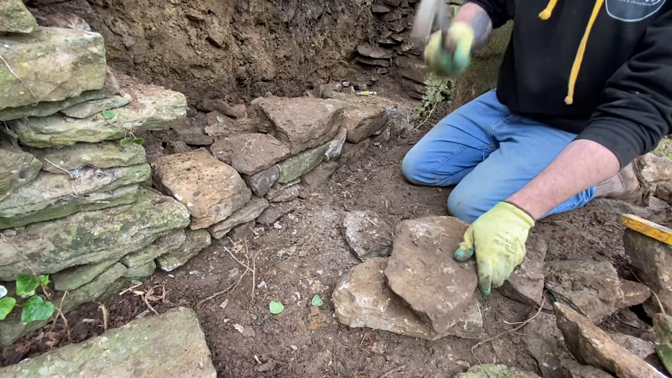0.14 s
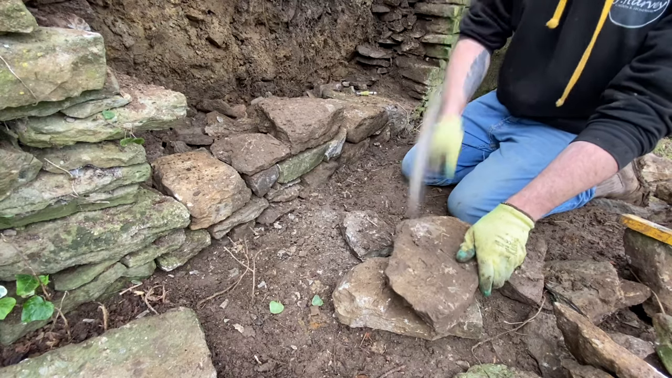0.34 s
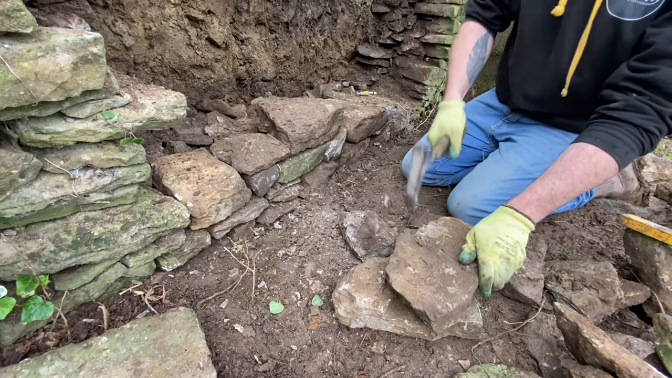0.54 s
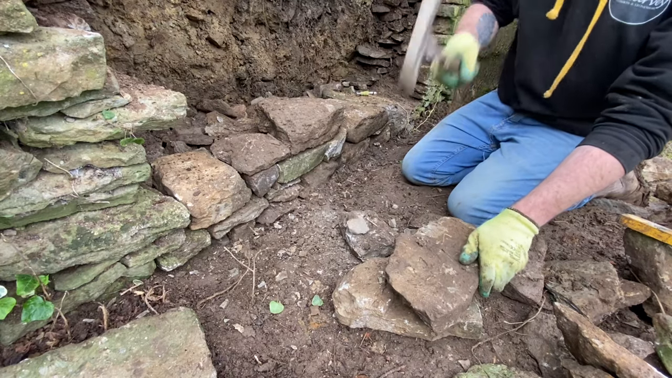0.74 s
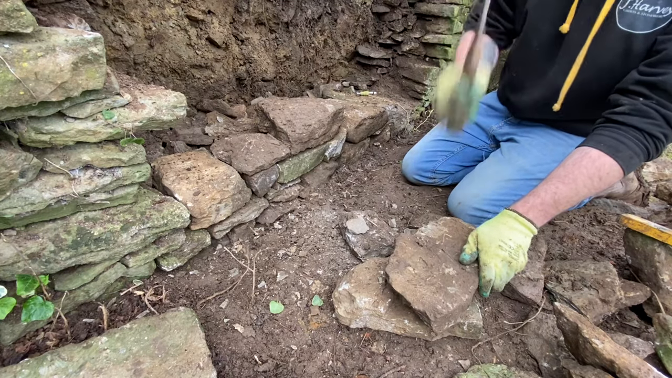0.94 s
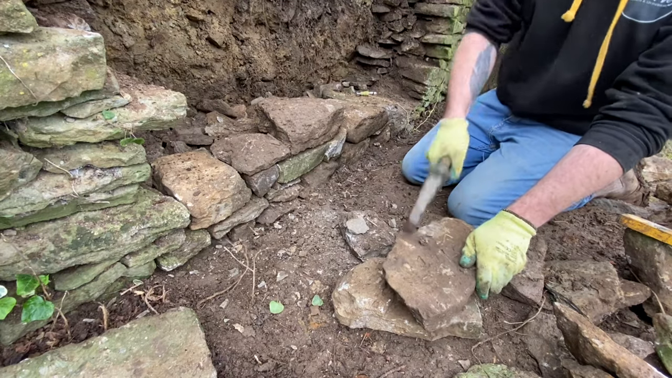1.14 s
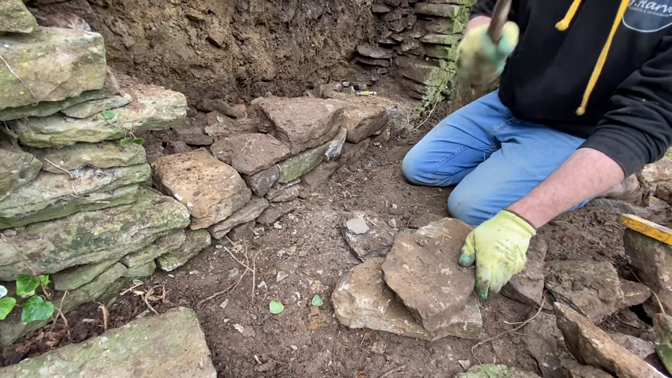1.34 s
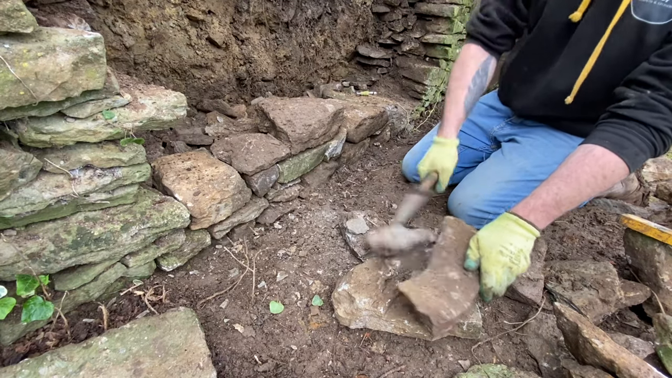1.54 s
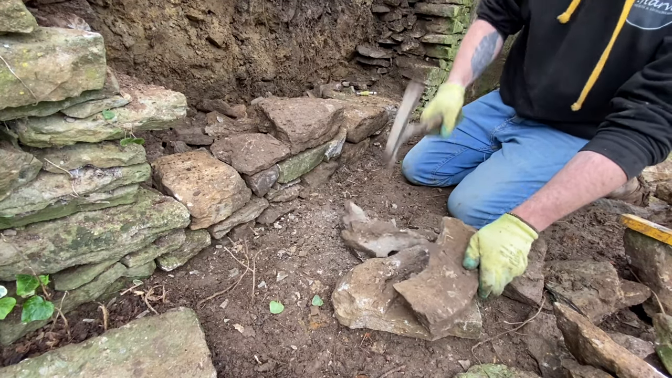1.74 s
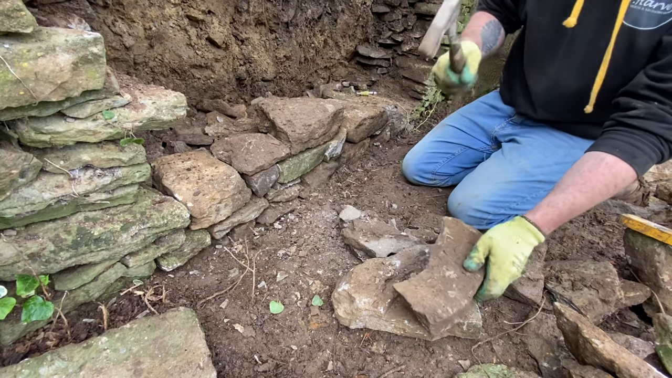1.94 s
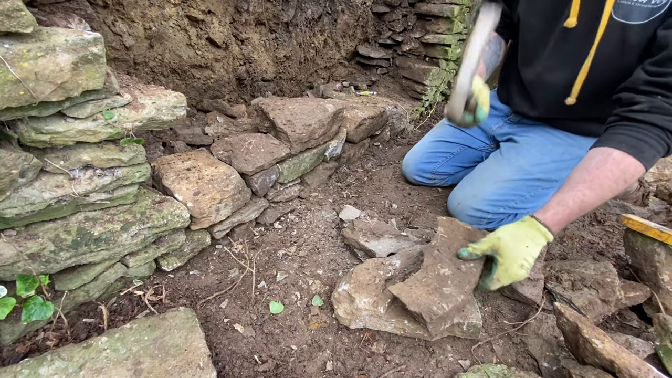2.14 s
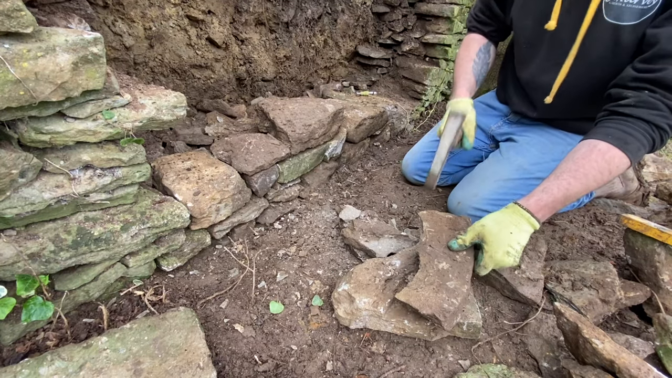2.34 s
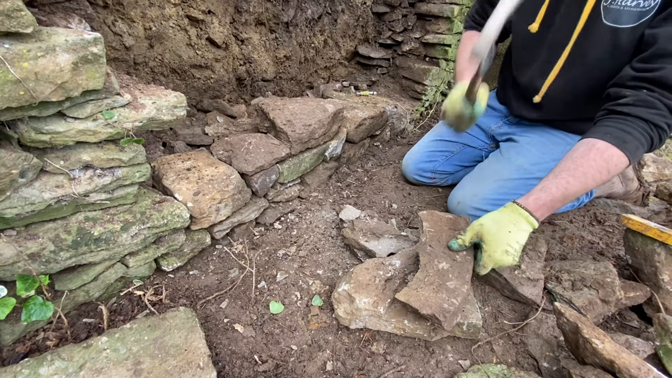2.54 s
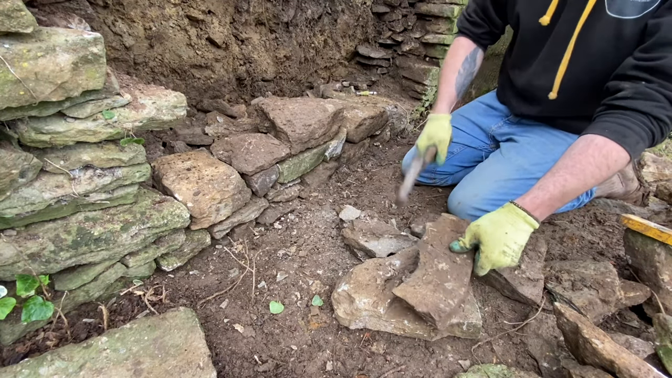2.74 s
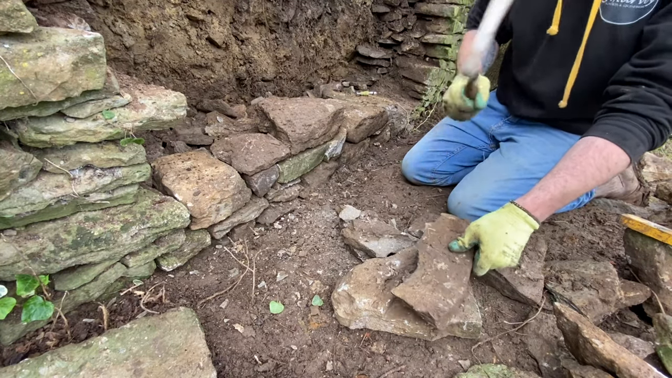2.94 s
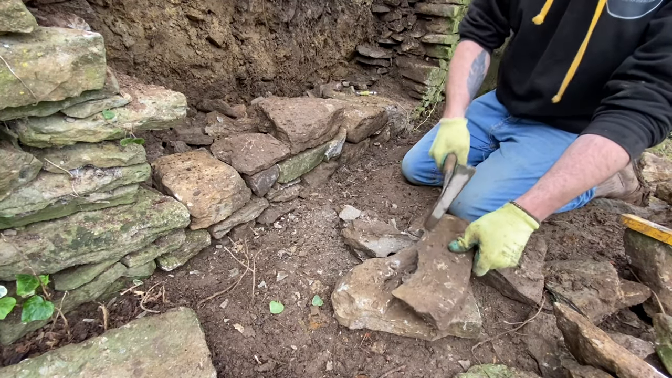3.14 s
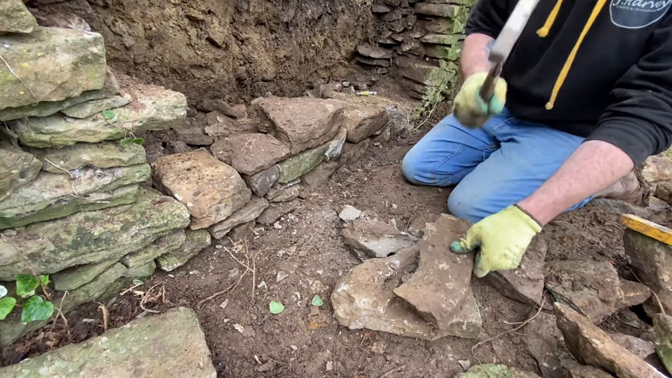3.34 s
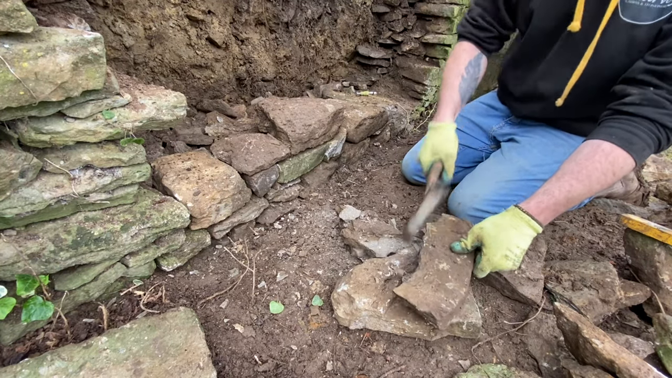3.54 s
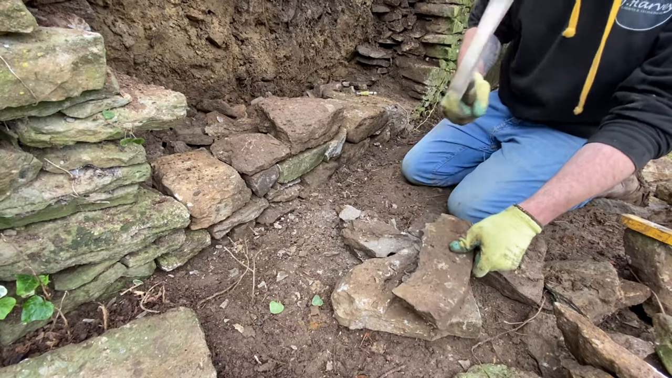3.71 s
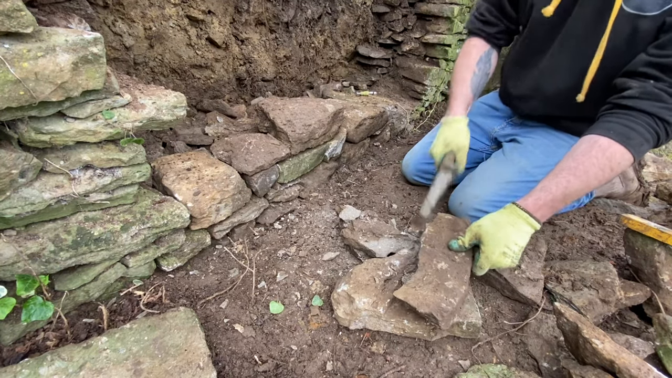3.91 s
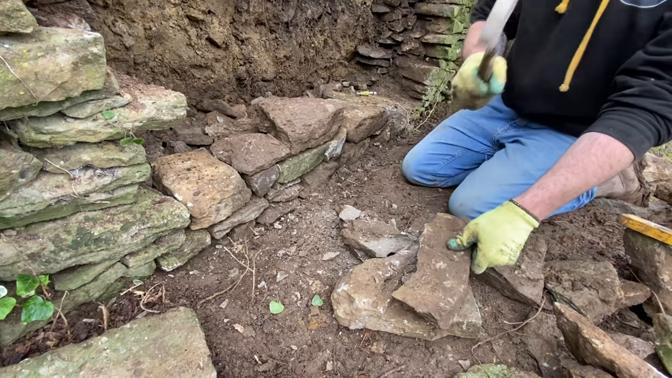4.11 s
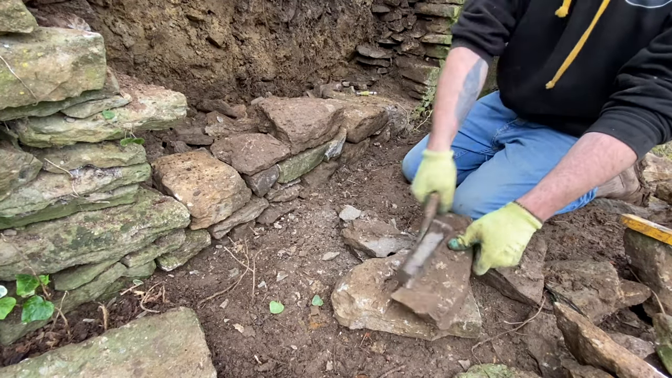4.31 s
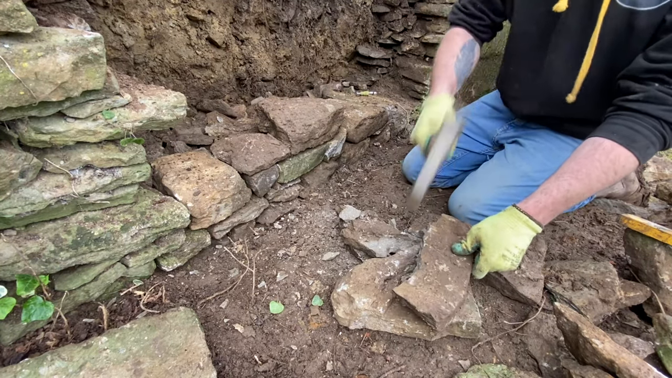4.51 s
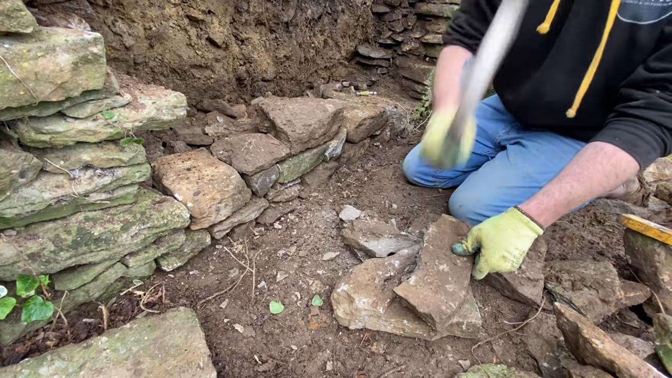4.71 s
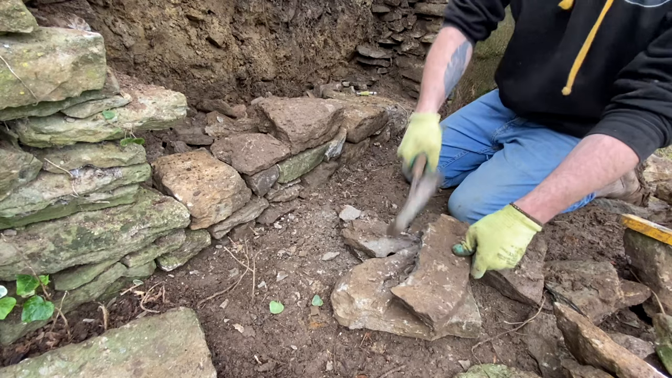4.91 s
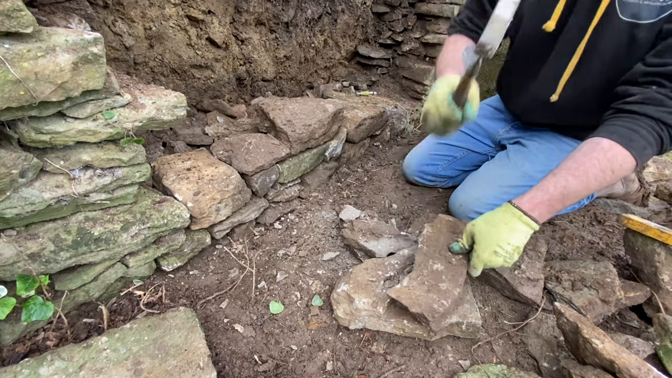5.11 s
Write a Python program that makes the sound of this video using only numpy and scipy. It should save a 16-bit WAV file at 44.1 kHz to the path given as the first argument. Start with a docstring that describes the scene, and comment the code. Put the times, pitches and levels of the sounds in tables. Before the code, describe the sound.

A steel hammer chips a stone slab in quiet open air, each dry crack followed by grit, small knocks and a faint echo.

```python
"""First a faint scrape of grit and a soft knock of stone on stone; then ten blows of a steel hammer on a slab's edge.
Each blow cracks, rings slab and steel in decaying modes, thumps the bare soil with a gliding tone and sprays noise grit.
The slab knocks back on the stone under it, and flakes tick down as short filtered noise.
A dry-stone wall stands close by; a far wall returns a faint smeared echo.
Behind the work: still air, a low rumble that swells late as filtered noise, and a bird far off in gliding whistles."""
import sys
import numpy as np
from scipy import signal
from scipy.fft import rfft, irfft
from scipy.io import wavfile
from scipy.ndimage import uniform_filter1d, minimum_filter1d

SR = 44100
rng = np.random.default_rng(int(sys.argv[2]) if len(sys.argv) > 2 else 0)


def log_audio(samples):
    """Write samples as a 16-bit WAV file to the path given in sys.argv[1]."""
    # one column per channel
    frames = np.atleast_2d(samples).T
    # limit to full scale, then quantise
    limited = np.clip(frames, -1, 1)
    pcm = np.round(limited * 32767).astype(np.int16)
    wavfile.write(sys.argv[1], SR, pcm)


N = 231948
AGE = np.arange(int(.3 * SR)) / SR  # s since a short sound began
REF_SAMPLES = .01 * SR  # 10 ms, the reference length for the energy of a short sound


def undb(db):
    """Decibels to gain."""
    return 10 ** (np.asarray(db) / 20)


def unit(x):
    """Scale a short sound to the energy of 10 ms at 0 dB."""
    energy = np.mean(np.sum(x ** 2, axis=-1))
    return x / np.sqrt(energy / REF_SAMPLES)


def fade(t60):
    """Exponential decay, 60 dB down after t60 seconds."""
    return np.exp(-np.log(1000) * AGE / t60)


def noise(size=len(AGE), width=0.26):
    """Stereo noise; width is side over mid."""
    mid, side = rng.standard_normal((2, size))
    return np.array([mid + width * side, mid - width * side])


def convolve(x, response):
    """Pass a sound through a response, keeping its length."""
    return signal.fftconvolve(np.atleast_2d(x), np.atleast_2d(response), axes=1)[:, :x.shape[-1]]


def colour(x, points):
    """Causal minimum-phase filter through (f/Hz, level/dB) points."""
    hz, db = np.transpose(points)
    size = 4096
    bins_hz = np.arange(size // 2 + 1) * SR / size
    curve_db = np.interp(np.log(bins_hz + 1), np.log(hz), db)
    # folding the cepstrum onto positive times makes the filter causal
    cepstrum = irfft(np.log(undb(curve_db)))
    cepstrum[1:size // 2] *= 2
    cepstrum[size // 2 + 1:] = 0
    return convolve(x, irfft(np.exp(rfft(cepstrum))))


def add(out, s, sound):
    """Mix a sound in at time s."""
    start = max(int(s * SR), 0)
    part = sound[..., :max(N - start, 0)]
    out[:, start:start + part.shape[-1]] += part


def mode(hz, t60):
    """One decaying resonance."""
    return np.sin(2 * np.pi * hz * AGE) * fade(t60)


def walk(rate):
    """Slow chance with a spread near 1, drawn rate times a second and smoothed."""
    hold = int(SR / rate)
    steps = np.repeat(rng.standard_normal(N // hold + 1), hold)
    return 1.1 * uniform_filter1d(steps, hold)[:N]


# spectrum of the still air: f/Hz, level/dB
AIR_SPECTRUM = [(25, -22.5), (40, -11), (63, 4), (100, -8), (200, -18.5), (450, -27), (800, -26.5),
                (1350, -27), (2600, -32), (5000, -39.5), (11000, -39.5), (16000, -55)]
AIR_DB = -67.5  # mean level of the air, which wavers slowly


def still_air():
    """The open place between the sounds: wide, soft noise that wavers slightly."""
    air = colour(noise(N, width=0.43), AIR_SPECTRUM)
    return undb(AIR_DB + 1.2 * walk(6)) * air / air.std()


# spectrum of the low rumble: f/Hz, level/dB
RUMBLE_SPECTRUM = [(30, -21), (65, 7.5), (130, 3), (200, -4.5), (300, -20.5), (500, -38.5), (1200, -59.5)]
# it swells once and stays up, around these levels
RUMBLE_QUIET_DB, RUMBLE_LOUD_DB, SWELL_START_S, SWELL_RISE_S = -74, -54, 3.65, 0.64
RUMBLE_UNREST_DB = 4.5  # spread of its quick rises and dips


def low_rumble():
    """Behind the far wall's echo, an uneven bass noise that swells late."""
    rumble = colour(noise(N, width=0.49), RUMBLE_SPECTRUM)
    since_s = np.arange(N) / SR - SWELL_START_S
    swell_db = np.interp(since_s, [0, SWELL_RISE_S], [RUMBLE_QUIET_DB, RUMBLE_LOUD_DB])
    return undb(swell_db + RUMBLE_UNREST_DB * walk(18)) * rumble / rumble.std()


# low and high whistle: t/s into the phrase, length/s before blurring, start f/Hz, end f/Hz, relative level/dB
BIRD_NOTES = [(0, 0.28, 3652, 3687, -68), (0.242, 0.22, 5290, 5220, -73)]
BIRD_START_S, BIRD_PERIOD_S = 4.215, 0.47


def distant_bird():
    """A bird far off repeats two gliding whistles; many paths through the yard make them waver and linger."""
    out = np.zeros((2, N))
    for s, length, start_hz, end_hz, db in BIRD_NOTES:
        along = np.minimum(AGE / length, 1)
        hz = start_hz + (end_hz - start_hz) * along
        whistle = np.sin(np.pi * along) * np.sin(2 * np.pi * np.cumsum(hz) / SR)
        for phrase_s in np.arange(BIRD_START_S, N / SR, BIRD_PERIOD_S):
            blurred = convolve(whistle, noise() * fade(0.15))
            add(out, phrase_s + s - .015, undb(db - 10.0) * blurred / blurred.std())
    return out


# spectrum of the open-air tail: f/Hz, level/dB
OPEN_AIR_SPECTRUM = [(100, 1), (600, -3), (1400, 0.5), (3400, -2), (4500, -8), (8000, -15), (12000, -17.5),
                     (16000, -28.5)]
# spectrum sent back by the far stone wall: f/Hz, level/dB
FAR_WALL_SPECTRUM = [(300, -9), (1000, 4), (2200, 14.5), (3400, 7.5), (4300, -8.5), (7000, -17),
                     (14000, -80)]


def surroundings(tail_db=-40.5, tail_t60=1.0, echo_db=-38.5, echo_s=.191):
    """Each blow leaves a faint open-air tail, and a far stone wall answers it with a soft smeared echo."""
    out, age = np.zeros((2, N)), np.arange(SR) / SR
    smear = np.sin(np.pi * np.minimum(AGE / 0.045, 1)) * fade(0.063)
    for s, force_db, _, _, _, balance_db, bright_db, _, steel_db in BLOWS:
        register_db = registers(force_db, balance_db, bright_db)
        power_db = 10 * np.log10(np.sum(undb(register_db) ** 2)) - 3
        tail = noise(SR) * undb(-60 * age / tail_t60) * np.minimum(age / .07, 1)
        add(out, s + 0.046, undb(power_db + tail_db) * unit(colour(tail, OPEN_AIR_SPECTRUM)))
        # the echo carries both the ring of the steel and the crack of the stone
        steel_echo = unit(convolve(mode(3569, 0.13), noise() * smear))
        add(out, s + echo_s, undb(steel_db - 26.0) * steel_echo)
        stone_echo = unit(colour(noise() * smear, FAR_WALL_SPECTRUM))
        add(out, s + echo_s, undb(power_db + echo_db) * stone_echo)
    return out


# spectrum scattered by the close wall and loose stones: f/Hz, level/dB
YARD_SPECTRUM = [(80, -7.5), (200, 2), (500, -6.5), (1300, -2), (2800, -6), (6000, -4.5), (15000, -6)]


def stonework(x, near_db=-22, near_t60=0.11):
    """The close wall and the stones lying about scatter the sound."""
    scatter = noise() * fade(near_t60) * (1 - np.exp(-AGE / 0.019))
    near = undb(near_db) * unit(colour(scatter, YARD_SPECTRUM))
    return convolve(x, near / np.sqrt(REF_SAMPLES))


# spectrum of a bump in the soil: f/Hz, level/dB
BUMP_SPECTRUM = [(35, -13), (70, 6), (140, 2), (260, -1.5), (450, -11.5), (900, -26.5), (2500, -55)]


def bump(t60=0.0067):
    """A stone settles into soft soil: a short, dull burst."""
    return unit(colour(noise(width=0.95) * fade(t60), BUMP_SPECTRUM))


def grit(envelope, spectrum, spread_db=4):
    """Dense grains of uneven size breaking or landing."""
    # each grain lasts 16 samples
    grains = np.repeat(rng.exponential(size=len(AGE)), 16)[:len(AGE)]
    sizes = undb(spread_db * np.minimum(grains, 4))
    return unit(colour(noise(width=.9) * sizes * envelope, spectrum))


# grit dragged under the slab or the glove: t/s, length/s, relative level/dB
SCRAPES_OF_GRIT = [(0.03, 0.16, -72.5), (0.524, 0.14, -73), (1.629, 0.27, -74), (2.038, 0.12, -73),
                   (2.206, 0.096, -67), (2.765, 0.074, -67.5)]
# spectrum of loose grit, dragged here and flying in hammering(): f/Hz, level/dB
SPRAY_SPECTRUM = [(1000, 8.5), (3000, 2), (6000, 0), (9000, -5), (12000, -5.5), (13300, -11),
                  (15000, -14.5), (16500, -18)]


def scraping():
    """Grit is dragged as the slab is shifted: each stroke swells and dies away."""
    out = np.zeros((2, N))
    for s, length, db in SCRAPES_OF_GRIT:
        stroke = np.sin(np.pi * np.minimum(AGE / length, 1))
        longer = np.sqrt(length * SR / REF_SAMPLES)  # a long stroke carries more energy
        add(out, s, undb(db) * longer * grit(stroke, SPRAY_SPECTRUM, spread_db=5.5))
    return out


# flakes landing: t/s, pitch f/Hz, relative level/dB
FLAKES = [(0.5853, 2410, -57.5), (0.6097, 11100, -61), (0.7398, 3320, -45), (1.6033, 3300, -57),
          (1.685, 2090, -37.5), (1.7064, 3260, -35), (1.7277, 3500, -48), (1.7336, 8050, -50.5),
          (1.8303, 1670, -56), (1.8534, 4970, -59), (1.8719, 3900, -41), (2.0864, 5840, -66),
          (3.9144, 12370, -53.5), (3.9368, 2520, -47), (3.9472, 10000, -45)]
FLAKE_HZ = 3000  # reference flake
TICK_DB, TICK_DB_PER_OCT = -18.5, 7.5  # tick relative to the flake's level; smaller flakes tick more
LANDING_DB, LANDING_DB_PER_OCT = -11.5, -3  # bump in the soil, likewise; smaller flakes bump less


def flakes():
    """Flakes tick, ring and bump the soil as they land; size sets the pitch and the balance."""
    out = np.zeros((2, N))
    for s, hz, db in FLAKES:
        octaves = np.log2(hz / FLAKE_HZ)
        shape = [(hz / 8, -19), (hz / 2, -8), (hz / 1.2, -5), (hz, 0), (hz * 1.25, -7), (hz * 2.2, -30)]
        add(out, s - .0005, undb(db) * unit(colour(noise() * fade(0.026), shape)))
        # a thin flake rings on briefly at its own pitch
        ring = unit(convolve(mode(hz, .055), noise() * fade(0.012)))
        add(out, s, undb(db - 10.5) * ring)
        tick = grit(fade(0.013), CRUNCH_SPECTRUM, spread_db=20)
        add(out, s - .0005, undb(db + TICK_DB + TICK_DB_PER_OCT * octaves) * tick)
        add(out, s, undb(db + LANDING_DB + LANDING_DB_PER_OCT * octaves) * bump(t60=0.13))
    return out


CRUMB_DB = -44.5  # relative to the blow's crunch column
CRUMB_FLIGHT_S = (0.15, 0.23)  # shortest and longest flight


def crumbs(count=2):
    """A few crumbs fly from each blow and tick down a moment later."""
    out = np.zeros((2, N))
    spectrum = [(2500, -4), (11000, 0), (16000, -5)]  # f/Hz, level/dB
    for s, *_, crunch_db, _ in BLOWS:
        for flight_s in np.interp(rng.random(count), [0, 1], CRUMB_FLIGHT_S):
            add(out, s + flight_s, undb(crunch_db + CRUMB_DB) * grit(fade(.008), spectrum))
    return out


# modes of the slab: nominal f/Hz, level/dB before weighting, t60/s before damping
SLAB_MODES = [(216, -15, 0.07), (580, -7, 0.018), (696, 1, 0.023), (780, -14, 0.02), (1186, -9.5, 0.028),
              (1418, -9, 0.032), (1604, -12.5, 0.068), (1980, -6, 0.0056), (2737, -3.5, 0.009),
              (2890, -11, 0.054), (3664, -6.5, 0.021), (3885, -13, .02), (4510, -15.5, 0.0083)]
# centres of the low, lower middle, upper middle and top registers: f/Hz
REGISTER_HZ = [700, 1400, 2400, 3600]


def slab(register_db, damping=1., scatter=0.21, scatter_t60=0.026, detune=0.032, dense_db=-9):
    """The place of contact weights the slab's modes; nearby stones scatter the push."""
    hz, db, t60 = np.transpose(SLAB_MODES)
    weight_db = db + np.interp(np.log(hz), np.log(REGISTER_HZ), register_db)
    push = scatter * noise(width=0.98) * fade(scatter_t60) * (1 - np.exp(-AGE / 0.0044))
    push[:, 0] -= 1  # the direct push comes first
    pitch = hz * (1 + detune * rng.uniform(-1, 1, len(hz)))
    # neighbouring modes swing in opposite senses at the point of contact
    swing = -np.cos(np.pi * np.arange(len(hz))) * undb(weight_db)
    ring = sum(g * unit(convolve(push, mode(f, t / damping))) for f, g, t in zip(pitch, swing, t60))
    # countless weak modes fill the gaps between the strong ones
    below = (60, weight_db[0] - 0.5)
    above = [(9000, weight_db[-1] - 12.5), (16000, weight_db[-1] - 30)]
    dense = colour(noise() * fade(.045 / damping), [below, *zip(hz, weight_db), *above])
    return ring + undb(dense_db) * unit(dense) * np.sqrt(np.sum(undb(weight_db) ** 2))


def edge(hz, hold_s=.006, linger=0.098, linger_t60=0.036, wander=0.087):
    """The struck edge rings; reflections off stones beside it hold it up for a few ms and shift its phase."""
    phase = 2 * np.pi * hz * AGE + wander * np.cumsum(noise(width=0.52), axis=1)
    envelope = np.exp(-(AGE / hold_s) ** 2) + linger * fade(linger_t60)
    return -unit(np.sin(phase) * envelope)


CONTACT_ORDER = 6.6  # steepness of the fall above the contact cut-off
SOIL_DB, SOIL_DB_PER_OCT = -0.5, -13.5  # bump in the soil under a soft touch; harder touches give less


def touch(db, contact_hz):
    """One touch of stone on stone: the softer it is, the duller the ring and the more goes into the soil."""
    register_db = db - 10 * np.log10(1 + (np.array(REGISTER_HZ) / contact_hz) ** CONTACT_ORDER)
    ring = undb(-1.43) * slab(register_db, damping=1.6, scatter=0.069, scatter_t60=0.02, dense_db=-6.0)
    rim = undb(register_db[1] - 5.0) * edge(1150, hold_s=0.0027, linger=0.11, linger_t60=0.018, wander=0.13)
    soil_db = db + SOIL_DB + SOIL_DB_PER_OCT * np.log2(contact_hz / SETTLE_HZ)
    return ring + rim + undb(soil_db) * bump()


# the slab drops back on its bed: t/s, relative level/dB, contact cut-off f/Hz, delay of the settling touch/s
KNOCKS_ON_BED = [(0.0538, -38, 1530, 0.063), (0.4563, -35, 1740, 0.0097), (1.118, -41, 1350, 0.028),
                 (1.5515, -36.5, 1508, 0.029), (2.0405, -51.5, 750, .035), (2.1288, -60, 892, 0.039),
                 (2.6693, -38, 3940, 0.035), (2.7048, -30.5, 1430, .005), (3.1708, -61, 800, 0.0094),
                 (3.4905, -25, 2560, .011), (4.3679, -38, 1390, 0.015), (4.8061, -31, 2800, 0.019),
                 (4.8486, -38, 1200, 0.065), (5.2518, -21.5, 2200, .02)]
SETTLE_HZ, SETTLE_DB, SETTLE_DB_PER_S = 745, -4, -250  # the second touch is soft, and weaker the later it comes


def rocking():
    """Pressed by the hand, the slab drops back on the stone under it, then settles with a duller knock."""
    out = np.zeros((2, N))
    for s, db, contact_hz, settle_s in KNOCKS_ON_BED:
        add(out, s - .0003, touch(db, contact_hz))
        # a hard first knock spends most of the drop
        spent_db = -4.0 * max(np.log2(contact_hz / 1400), 0)
        settle_db = db + spent_db + SETTLE_DB + SETTLE_DB_PER_S * settle_s
        add(out, s + settle_s, touch(settle_db, SETTLE_HZ))
    return out


# base levels at force 0 dB of the slab's low, middle and top registers
LOW_DB, MIDDLE_DB, TOP_DB = -24, -22, -24


def registers(force_db, balance_db, bright_db):
    """Levels of the slab's four registers: force lifts all, the place of contact trades one ring for the other."""
    lower_db, upper_db = MIDDLE_DB + balance_db / 2, MIDDLE_DB - balance_db / 2
    return force_db + np.array([LOW_DB, lower_db, upper_db, TOP_DB + bright_db])


def crack(hz=1550, t60=0.0048):
    """The sudden stop of the hammer head sends out one short wave."""
    return -unit(mode(hz, t60))


def thud(start_hz=200, end_hz=59, glide_s=0.009, peak_s=0.042, sharp=6, lead=0.21):
    """The soil takes the blow; its deepest part arrives last."""
    hz = end_hz + (start_hz - end_hz) * np.exp(-AGE / glide_s)
    swell = (AGE / peak_s * np.exp(1 - AGE / peak_s)) ** sharp + 1.2 * fade(0.11)
    phase = 2 * np.pi * np.cumsum(hz) / SR
    return unit(np.array([1.25 * np.sin(phase), 0.68 * np.sin(phase + lead)]) * swell)


def crush():
    """The surface crumbles for a moment before the head meets solid stone."""
    onset = (AGE / 0.0035) ** 2 * fade(0.0055)
    trail = .25 * fade(0.045) * np.minimum(AGE / 0.0018, 1)
    return grit(onset + trail, CRUNCH_SPECTRUM, spread_db=5.5) * np.array([[.92], [1.06]])


def steel():
    """The hammer head rings in three modes, a little stronger on the right."""
    ring = unit(mode(3569, 0.13)) + undb(-32.5) * unit(mode(2600, 0.8)) + undb(-27.5) * unit(mode(4500, 0.11))
    return ring * np.array([[.8], [1.15]])


# hammer blows: t/s, force level/dB, hollow clack f/Hz, lower edge ring f/Hz, upper edge ring f/Hz,
# lower over upper ring level/dB, brightness level/dB, relative crunch level/dB, relative steel ring level/dB
BLOWS = [(0.3752, 1, 860, 1246, 2375, -3.5, -0.5, -24.5, -36),
         (1.0395, 2, 860, 1354, 2405, 1, 3.5, -32.5, -40.5), (1.5144, 1, 790, 1716, 2532, -5, 2, -33, -49),
         (2.6441, -0.5, 740, 1515, 2223, -0.5, -3.5, -27.5, -55.5),
         (3.0939, -1.5, 610, 1480, 2833, 3.5, 10, -25, -52),
         (3.47, -1.5, 660, 1410, 2207, -6.5, -1.5, -23, -41.5),
         (3.8554, -2.5, 590, 1506, 2650, 8, -0.5, -24.5, -59), (4.3221, 0, 780, 1574, 2465, 7, 0, -41, -37),
         (4.782, -0.5, 725, 1414, 1922, 2, -3.5, -25, -35), (5.2351, 0, 700, 1445, 2490, 1, -5.5, -26, -42)]
# spectrum of breaking stone: f/Hz, level/dB
CRUNCH_SPECTRUM = [(1500, -9.5), (3500, -1), (5500, -3.5), (8000, -8.5), (11500, -5), (13300, -14),
                   (15000, -8), (16500, -20.5)]
CLACK_DB, THUD_DB = -26, -31  # hollow clack of slab on stone and thud in the ground, at force 0 dB
SPRAY_DB = -9.5  # flying grit, relative to the crunch column
PAN_DB = 2  # ring of the stone, left minus right


def hammering():
    """Every blow crushes the edge, clacks the slab, rings stone and steel, thumps the soil and throws grit."""
    out = np.zeros((2, N))
    pan = undb(np.array([[PAN_DB], [-PAN_DB]]) / 2)
    for s, force_db, clack_hz, lower_hz, upper_hz, balance_db, bright_db, crunch_db, steel_db in BLOWS:
        register_db = registers(force_db, balance_db, bright_db)
        add(out, s - .0003, undb(-1.0) * pan * slab(register_db))
        add(out, s - .0003, undb(register_db[1] + 1.5) * pan * edge(lower_hz))
        add(out, s - .0003, undb(register_db[2] + 1.6) * pan * edge(upper_hz, hold_s=.0038, wander=0.13))
        clack = edge(clack_hz, hold_s=0.011, linger=0.066, linger_t60=.03, wander=0.066)
        add(out, s, undb(force_db + CLACK_DB) * clack)
        add(out, s - .0003, undb(register_db[1] - 10.5) * crack())
        add(out, s - .002, undb(crunch_db + 2.5) * crush())
        add(out, s, undb(steel_db + 9.0) * steel())
        add(out, s, undb(force_db + THUD_DB) * thud())
        add(out, s, undb(register_db[0] - 11.0) * bump(t60=0.021))
        spray = grit(fade(0.12), SPRAY_SPECTRUM, spread_db=3.5)
        add(out, s + .012, undb(crunch_db + SPRAY_DB) * spray)
    return out


def scene():
    """The work on the stone, in its yard."""
    background = still_air() + low_rumble() + distant_bird()
    left, right = scraping() + flakes() + crumbs() + rocking() + hammering()
    # the sound reaches the left microphone port two samples later
    work = np.array([np.roll(left, 2), right])
    return background + surroundings() + stonework(work) + work


# treble colour of the microphone port: f/Hz, level/dB
PORT_RESPONSE = [(7000, 0), (8500, -1), (11500, -0.5), (13300, -5), (15000, -1.5), (16500, -2)]


def record(dry, ceiling=0.85, hold_s=0.0011):
    """The deepest bass is cut, the microphone port colours the treble, a fast limiter tames peaks, the top is cut."""
    x = signal.sosfilt(signal.butter(3, 42, "high", fs=SR, output="sos"), dry)
    x = colour(x, PORT_RESPONSE)
    size = int(hold_s * SR)
    gain = np.minimum(1, ceiling / (np.abs(x) + 1e-9))
    gain = uniform_filter1d(minimum_filter1d(gain, size), size)
    top_cut = signal.ellip(8, .2, 70, 16000, fs=SR, output="sos")
    return signal.sosfilt(top_cut, x * gain)


dry = scene()
out = record(dry)
log_audio(out)
```